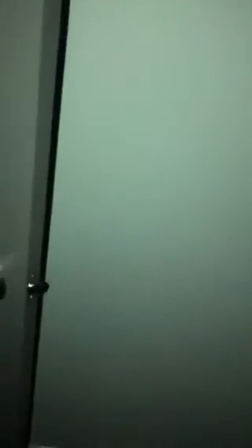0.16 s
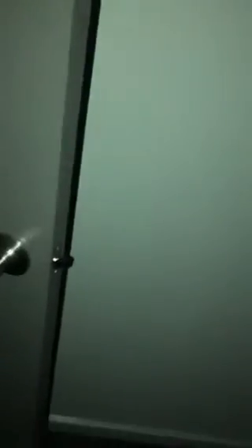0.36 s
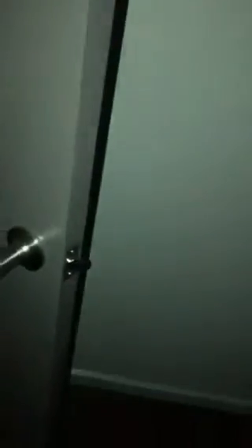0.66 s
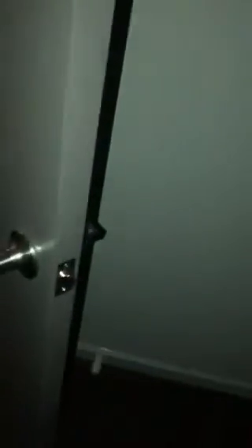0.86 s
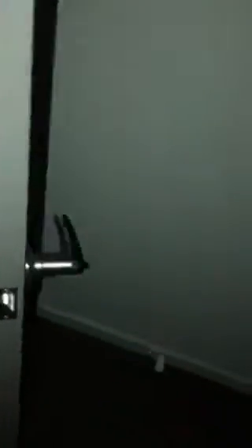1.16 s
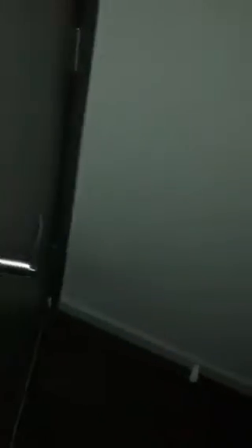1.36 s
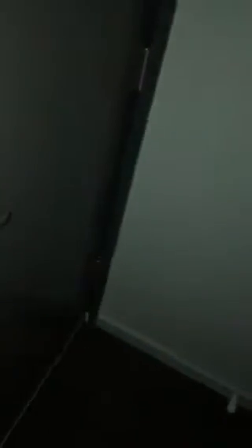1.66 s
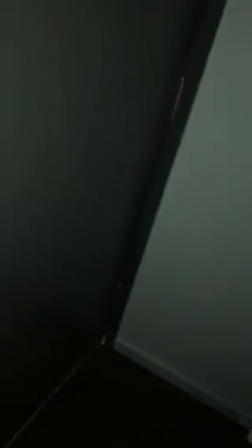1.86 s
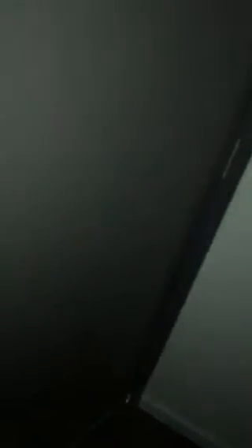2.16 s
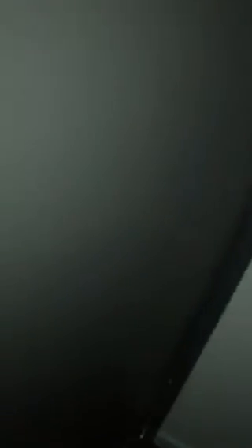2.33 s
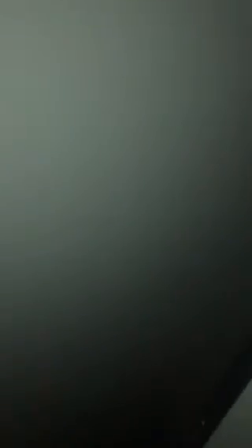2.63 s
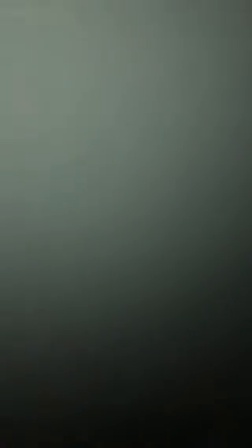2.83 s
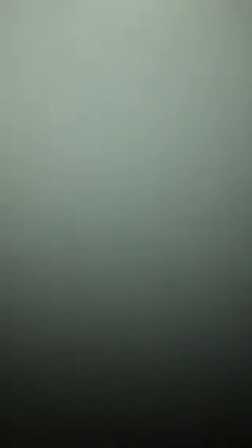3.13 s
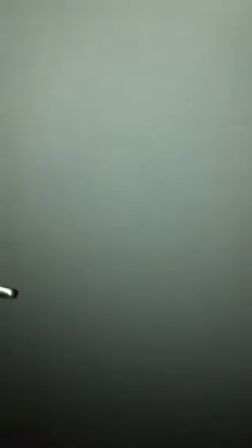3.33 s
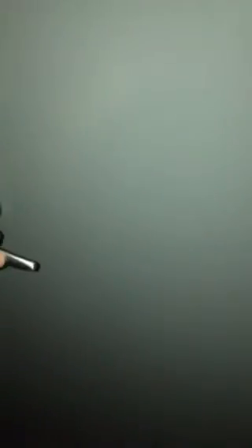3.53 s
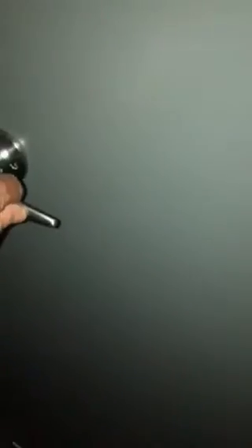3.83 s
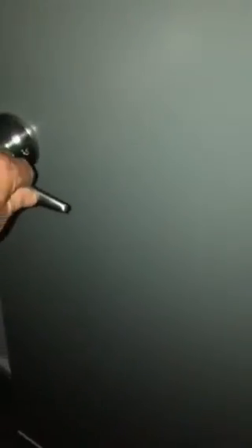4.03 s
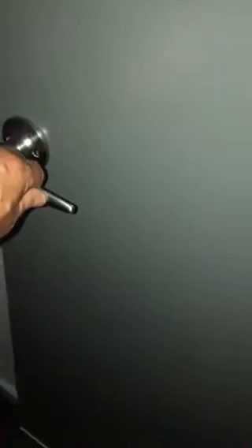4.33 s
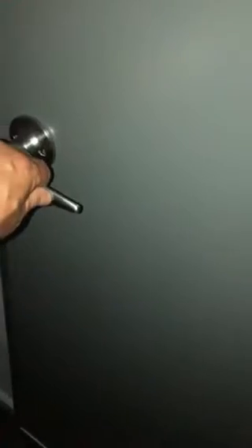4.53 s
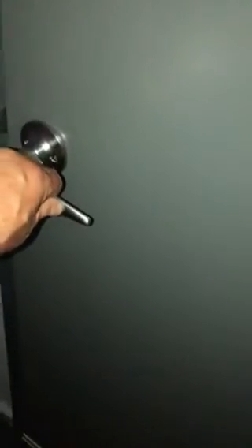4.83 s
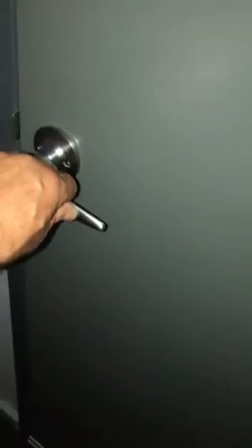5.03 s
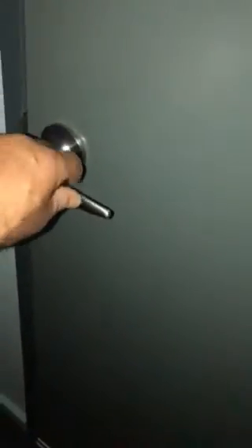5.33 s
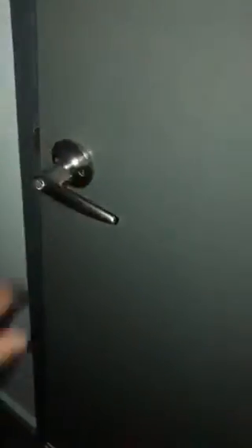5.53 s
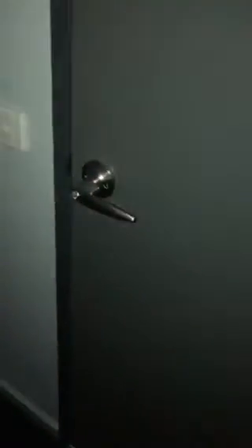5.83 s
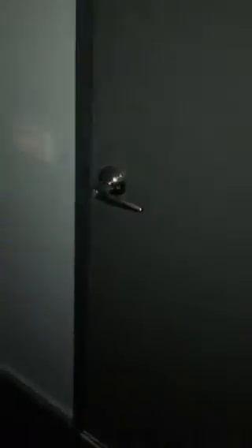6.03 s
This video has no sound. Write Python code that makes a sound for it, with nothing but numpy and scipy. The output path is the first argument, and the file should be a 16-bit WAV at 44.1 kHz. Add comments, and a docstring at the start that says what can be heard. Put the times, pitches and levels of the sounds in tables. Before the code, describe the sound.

Soft shoe knocks and cloth rustles in an echoing bare shed, then a door latch clacks sharply, the lever clunks and the bolt snaps home.

```python
"""A light door in a bare, echoing shed, an arm's length from the microphone, over still air and a faint hum.
First shoes knock and scuff and a sleeve rustles: dull noise knocks that ring boards, and rubbed noise. The hinge then
whistles thinly while the hum sinks away and returns, and from 2.1 s the door leaf bumps now and then: soft pushes on
low resonances. Later the latch bolt clacks on the strike plate, the loaded lever creaks and clunks and the bolt snaps
home: chattering contacts that ring steel, and a lingering handle. The leaf thuds in its frame after the latch; shoes
and sleeve stir again at the end. Noise tails give the echo of the shed."""
import sys
import numpy as np
from scipy import signal
from scipy.fft import rfft, irfft
from scipy.io import wavfile
from scipy.ndimage import uniform_filter1d

SR = 44100
rng = np.random.default_rng(int(sys.argv[2]) if len(sys.argv) > 2 else 0)


def put_to_file(sound):
    """Save the sound as 16-bit audio at rate SR, in the file named by the first command-line argument."""
    columns = np.atleast_2d(sound).T  # one column per channel
    safe = np.clip(columns, -1, 1)
    whole_steps = np.round(safe * 32767)
    wavfile.write(sys.argv[1], SR, whole_steps.astype(np.int16))


N = 272559
SIZE, ECHO_SIZE = 8192, 65536  # samples in a short response and in an echo
TIME = np.arange(N) / SR
AGE = TIME[:SIZE]

# Levels are relative within each layer; the mix sets the final balance.
# The shed's echo. Each row: frequency in Hz, time to die away by 60 dB in s, echo level in dB.
SHED_ECHO = [(49.6, 0.64, -1.5), (155, 0.59, 4), (400, 0.98, 3), (955, 1.31, 1), (1850, 1.67, 3),
             (3020, 1.23, -2), (7600, 0.96, -4.5), (15000, 0.55, -6)]
# Standing waves between the walls. Each entry: frequency in Hz.
STANDING_WAVES_HZ = [209, 337, 436, 579, 661, 770, 820, 1033, 1183, 1250, 1370, 1483, 1547, 1760]

# Still air around the microphone. Each row: frequency in Hz, gain in dB.
AIR_COLOUR = [(15, -56.5), (25, -22.5), (64, -3.5), (87, -4), (117, -8.5), (141, -6.5), (195, -6.5),
              (229, -12.5), (405, -13), (1890, -40.5), (2410, -31.5), (3080, -46), (16000, -42)]
AIR_DB = -63.5  # rms
# Lines of the machine hum. Each row: frequency in Hz, relative level in dB.
HUM_LINES = [(75.4, -64.5), (150.7, -72.5), (231.5, -72)]
# Rise and fall of the hum. Each row: time in seconds, gain in dB.
HUM_LEVEL = [(0, 3.5), (1.8, -34), (3.2, 4), (6, 4.5)]

# Soles sliding on the floor. Each row: start in seconds, length in seconds, level in dB.
SHOE_SLIDES = [(.46, 0.12, -63.5), (.66, 0.39, -56), (1.7, 0.23, -67), (2.15, 0.65, -62.5),
               (2.97, 0.043, -59), (5.55, 0.11, -58), (6.13, 0.045, -65)]
# Colour of the sliding soles. Each row: frequency in Hz, gain in dB.
SCUFF_COLOUR = [(30, -2), (120, 2), (300, -5.5), (750, 0.5), (1700, -9.5), (3000, -15.5), (6000, -26),
                (15000, -36)]
# Sleeve rustling at each move of the arm. Each row: start in seconds, length in seconds, level in dB.
SLEEVE_MOVES = [(.07, 0.045, -66), (.76, 0.078, -65.5), (1.36, 0.042, -65.5), (1.56, .05, -71.5),
                (2.26, 0.074, -63.5), (2.65, 0.23, -75), (3.75, 0.076, -61.5), (5.68, 0.17, -64),
                (6.12, 0.075, -70)]
# Colour of the rustling cloth. Each row: frequency in Hz, gain in dB.
CLOTH_COLOUR = [(300, -6), (1500, -3), (3000, -0.5), (6000, -6.5), (10000, -15), (15000, -19)]
SLEEVE_REST_DB = -74  # the cloth is never quite still; level within the rubbing layer
# Cloth brushing quickly over cloth. Each row: start in seconds, length in seconds, level in dB.
SLEEVE_SWISHES = [(1.11, 0.055, -85), (1.3, 0.099, -59), (1.56, 0.06, -70.5), (5.675, 0.045, -67.5)]
# Colour of the quick brushing. Each row: frequency in Hz, gain in dB.
SWISH_COLOUR = [(2000, -17), (6000, -2), (9500, 4), (15000, 3.5)]
# The turning hinge rubbing. Each row: start in seconds, length in seconds, level in dB.
HINGE_TURNS = [(1.74, 0.16, -66.5)]
# Colour of the hinge's thin whistle. Each row: frequency in Hz, gain in dB.
HINGE_COLOUR = [(1500, -10), (2600, -5), (3500, -17), (4650, -10.5), (4950, -7), (5250, -21), (9000, -48)]

# Weight landing on the floor. Each row: start in seconds, level in dB, softness corner in Hz.
FOOTFALLS = [(.034, -56, 400), (0.379, -44.5, 174), (.747, -55, 89), (1.09, -34.5, 294), (1.11, -47.5, 90),
             (2.257, -46, 320), (2.976, -49.5, 600), (5.667, -46.5, 400)]
# Resonances of the floor. Each row: frequency in Hz, width in Hz, level in dB.
FLOOR_MODES = [(47, 11, 11.5), (59.4, 29, 6), (105, 15, -2.5), (141, 38, -9), (193.4, 20, 1), (215, 30, 1),
               (377, 330, -4)]
# Shoe scuffs and soft knocks on wood.
# Each row: start in seconds, level in dB, hardness as upper edge in Hz, die-away time in seconds.
KNOCKS = [(.032, -51, 3200, .018), (.372, -47.5, 2250, 0.038), (.74, -52.5, 2010, 0.0048),
          (1.077, -42.5, 2300, 0.036), (2.084, -50, 1500, .014), (2.255, -47, 2920, 0.021),
          (2.448, -48, 2390, 0.033), (2.485, -49, 1860, .02), (2.52, -50, 2440, 0.011),
          (2.626, -48.5, 1600, 0.026), (2.8991, -41.5, 1720, 0.0052), (3.12, -44.5, 1740, 0.00092),
          (3.146, -48.5, 1850, 0.014), (3.253, -49, 1150, 0.0084), (4.096, -64.5, 2600, 0.0067),
          (5.325, -43, 1500, 0.0066), (5.367, -42.5, 943, 0.017), (5.403, -48, 1110, 0.004),
          (5.513, -52.5, 1826, 0.0095), (6.168, -49, 1150, 0.0079)]
# Spectrum of a knock, higher for a harder one. Each row: multiple of its upper edge, gain in dB.
KNOCK_SHAPE = [(0.044, -10.5), (.18, -3.5), (.34, 0.5), (.9, -6), (1.35, -15.5), (2.2, -32.5), (5, -46)]
# Wooden boards that every knock rings. Each row: frequency in Hz, width in Hz, level in dB.
BOARD_MODES = [(360, 31, -0.5), (567, 17, 3.5), (632, 28, 1), (756, 44, -1), (848, 18, 2), (998, 29, -4),
               (1125, 32, -4), (1375, 49, 1), (1600, 46, 1.5), (1865, 23, -19), (3650, 200, 4.5)]
# Colour of grit crushed on the floor. Each row: frequency in Hz, gain in dB.
GRIT_COLOUR = [(300, -4), (1500, -3), (2700, -1.5), (3800, 0.5), (5300, 0), (6800, -6), (9000, -12.5),
               (11300, -15.5), (15000, -22.5)]
# Grit relative to a knock with this upper edge; harder knocks crush more.
GRIT_DB, GRIT_EDGE_HZ, GRIT_DB_PER_OCTAVE = -20.5, 2400, 16
# Sharp little ticks. Each row: start in seconds, level in dB, upper edge in Hz, die-away time in seconds.
TICKS = [(.033, -57.5, 4000, .018), (.385, -58.5, 2800, 0.047), (1.083, -54, 2460, 0.085),
         (2.006, -53, 7560, .008), (2.012, -54, 3530, 0.044), (2.084, -57.5, 4000, 0.016),
         (2.256, -65, 2000, 0.033), (2.447, -62, 14000, 0.0042), (2.463, -67, 14000, .005),
         (2.485, -56, 7500, 0.016), (2.6257, -56, 16000, 0.0067), (2.8987, -49.5, 15000, 0.0048),
         (3.184, -67.5, 4050, 0.0043), (4.096, -63.5, 4020, 0.0049), (5.326, -55, 7000, 0.011),
         (5.367, -55, 12000, 0.012)]
# Tiny resonances that the ticks ring. Each row: frequency in Hz, width in Hz, level in dB.
TINKLE_MODES = [(4300, 540, 3.5), (5440, 600, -5), (6380, 310, -1), (11100, 200, -3), (11500, 600, 3.5),
                (13300, 1200, 0)]

# The door leaf bumped and seating in its frame. Each row: start in seconds, level in dB, softness corner in Hz.
BUMPS = [(2.101, -47.5, 240), (2.491, -47.5, 500), (2.645, -51, 335), (3.122, -47.5, 520),
         (4.536, -39.5, 228), (5.027, -62, 130), (5.333, -32, 124)]
# Resonances of the door leaf. Each row: frequency in Hz, width in Hz, level in dB.
LEAF_MODES = [(80, 12, -7), (101, 50, -8), (162, 30, 2.5), (185, 52, -6.5), (221, 28, 2), (318, 110, 3.5),
              (430, 60, -1)]
# The lever meeting its stop, then slipping from the fingers.
# Each row: start in seconds, clunk level in dB, metallic tick level in dB.
CLUNKS = [(5.0217, -47, -44), (5.0241, -32.5, -45), (5.353, -45, -62), (5.385, -49, -67)]
# Resonances of the lever. Each row: frequency in Hz, width in Hz, level in dB.
LEVER_MODES = [(800, 33, 0.12), (920, 120, -1.5), (1114, 100, -1.09)]
# Resonances of its spring. Each row: frequency in Hz, width in Hz, level in dB.
SPRING_MODES = [(3100, 220, -9.5), (6500, 90, 7), (9830, 125, 1), (13800, 330, -12)]
# Lingering ring of the handle. Each row: frequency in Hz, level in dB, time to die away by 60 dB in s.
HANDLE_TONES = [(1183, 8, 0.99), (1910, -7, 1), (2889, -1.5, 0.74), (3500, 6, .5), (3970, 9.5, 0.5),
                (4140, 0, 0.34), (5276, -7.5, .4), (6060, -5, 0.86), (7900, 2.5, .47), (14770, -16.5, .25)]
# Latch bolt against the strike plate, then small dull creaking ticks of the loaded lever.
# Each row: start in seconds, level in dB, chatter time in seconds, softness corner in Hz.
STRIKES_AND_CREAKS = [(4.5331, -43, .0015, 6000), (4.535, -23.5, .001, 15000),
                      (4.5388, -31.5, 0.00041, 1500), (4.5505, -41.5, .0008, 13000),
                      (4.757, -40.5, 0.00036, 3500), (4.776, -43.5, 0.000082, 3900),
                      (5.0014, -45, .0002, 4500), (5.015, -46.5, 0.00054, 4000)]
# Resonances of the strike plate. Each row: frequency in Hz, width in Hz, level in dB.
PLATE_MODES = [(1150, 58, -20), (1480, 72, -6), (1580, 140, 3), (1740, 150, -8), (2730, 180, 0),
               (2950, 110, -8.5), (4500, 320, 1), (5700, 350, -7), (7160, 170, -14), (8750, 350, -15.5),
               (10500, 370, -7.5), (14200, 150, -22.5)]
# Colour of the crack at the plate. Each row: frequency in Hz, gain in dB.
PLATE_CRACK = [(100, -6.5), (400, -15), (680, -16.5), (1050, 0), (1650, 1), (2200, -7.5), (3000, 4.5),
               (4000, -8.5), (5500, -2), (8500, -6.5), (10500, -12.5), (11100, -18.5), (16000, -23.5)]
# Bolt sliding and snapping home.
# Each row: start in seconds, level in dB, chatter time in seconds, softness corner in Hz.
SNAPS = [(5.0435, -39.5, 0.00053, 4500), (5.0566, -42, .004, 7000), (5.062, -26.5, 0.0017, 16000),
         (5.0637, -23, 0.0014, 7000), (5.0687, -37, 0.0022, 9000), (5.0788, -45, .0018, 15000)]
# Resonances of the bolt. Each row: frequency in Hz, width in Hz, level in dB.
BOLT_MODES = [(484, 96, 0), (1140, 150, -11), (1597, 67, 6), (2150, 200, -9), (2750, 75, 1),
              (3500, 150, 4.5), (4000, 200, 3.5), (4550, 200, -1.5), (5200, 220, -9), (6340, 200, 0),
              (7000, 260, -3.5), (7700, 130, -3.5), (9500, 150, -22), (12600, 200, -26), (14800, 200, -18)]
# Colour of the crack of the bolt. Each row: frequency in Hz, gain in dB.
BOLT_CRACK = [(100, -20.5), (450, -6.5), (1000, -1.5), (1600, -2.5), (2200, -2), (3150, -1.5), (3750, 0),
              (4850, -9), (5400, -2), (6500, -2.5), (9000, -9), (12000, -10), (15000, -6.5)]


def undb(db):
    """Decibels to gain."""
    return 10 ** (np.asarray(db) / 20)


def blow(x, db):
    """Scale a blow to the energy of a hundredth of a second at this rms level."""
    return x * undb(db) * np.sqrt(SR / 100 / np.sum(x ** 2))


def add(track, s, x):
    """Mix a sound in at a time in seconds."""
    start = int(np.clip(s * SR, 0, N - 1))
    track[start:start + len(x)] += x[:N - start]


def along(points, size):
    """Spread (Hz, value) points over the bins of a transform, on a log frequency axis."""
    hz, value = np.transpose(points)
    return np.interp(np.log(np.fft.rfftfreq(size, 1 / SR) + 1), np.log(hz), value)


def through(x, response):
    """Pass a sound through a response, keeping its length."""
    return signal.fftconvolve(x, response)[:len(x)]


def colour(x, points):
    """Filter with a (Hz, dB) shape, causal and minimum-phase by folding the cepstrum."""
    cepstrum = irfft(np.log(undb(along(points, SIZE))))
    cepstrum[1:SIZE // 2] *= 2
    cepstrum[SIZE // 2 + 1:] = 0
    return through(x, irfft(np.exp(rfft(cepstrum))))


def ring(modes):
    """Response of a body: one decaying sine per resonance, dying faster the wider it is."""
    response = np.zeros(SIZE)
    for hz, width_hz, db in modes:
        decay = width_hz * np.exp(-np.pi * width_hz * AGE)
        response += undb(db) * decay * np.sin(2 * np.pi * hz * AGE)
    return response


def contact(length, first_db):
    """Force of a blow: a first impact and a dying chatter of tiny contacts, even over all pitches."""
    chatter = blow(rng.standard_normal(SIZE) * np.exp(-AGE / length), 0)
    impact = blow(signal.unit_impulse(SIZE), first_db)
    even = irfft(np.exp(1j * np.angle(rfft(chatter + impact))))  # keep phase, flatten the spectrum
    return even * np.exp(-(AGE / (4 * length)) ** 2)


def walk(rate):
    """Random levels drawn at a rate in Hz with straight slopes between; spread a little under 1."""
    hold = int(SR / rate)
    return uniform_filter1d(np.repeat(rng.standard_normal(N // hold + 1), hold), hold)[:N]


def hiss(points):
    """Coloured noise of rms 1."""
    noise = colour(rng.standard_normal(N), points)
    return noise / np.std(noise)


def shed(build_s, standing_width_hz, standing_lift, early_lift, early_s):
    """Echo of the bare walls, longest in the middle range; every blow takes its own paths around them."""
    age = TIME[:ECHO_SIZE]
    bins_hz = np.fft.rfftfreq(2 * ECHO_SIZE, 1 / SR)
    standing = sum(1 / (1 + ((bins_hz - hz) / standing_width_hz) ** 2) for hz in STANDING_WAVES_HZ)
    ripple = 1 + standing_lift * standing
    ripple /= uniform_filter1d(ripple, size=1200)  # the peaks gather energy from their neighbours
    spectrum = rfft(rng.standard_normal(2 * ECHO_SIZE)) * ripple
    bands = []
    for k, (_, t60, db) in enumerate(SHED_ECHO):
        share = along([(row[0], j == k) for j, row in enumerate(SHED_ECHO)], 2 * ECHO_SIZE)
        decay = np.log(1000) / t60
        build = 1 - np.exp(-(age / build_s) ** 2)
        fade = np.exp(-decay * age) * build * np.sqrt(2 * decay / SR)
        fade *= 1 + early_lift * np.exp(-age / early_s)  # the nearest walls answer first and strongest
        bands.append((irfft(spectrum * share), fade * undb(db)))

    def echo(x):
        """The tail that a sound leaves in the shed, cut from a random place in the scattered noise."""
        start = rng.integers(ECHO_SIZE)
        tail = sum(scatter[start:start + ECHO_SIZE] * fade for scatter, fade in bands)
        return signal.fftconvolve(x, tail)
    return echo


def background():
    """Still air as coloured noise, and a machine hum of sines that waver in level and phase."""
    hum = np.zeros(N)
    for hz, db in HUM_LINES:
        level = undb(db - 5 + 1.71 * walk(18)) * np.sqrt(2)
        hum += level * np.sin(2 * np.pi * hz * TIME + 0.3 * walk(3))
    hum *= undb(np.interp(TIME, *np.transpose(HUM_LEVEL)))
    return hum + hiss(AIR_COLOUR) * undb(AIR_DB)


def rub(strokes, points, attack_s, release_s, rough_db):
    """Sliding friction: each stroke swells, holds and dies away, catching and slipping as it goes."""
    effort = np.zeros(N)
    for s, length, db in strokes:
        early = np.maximum(s - TIME, 0)
        late = np.maximum(TIME - s - length, 0)
        effort += undb(db) * np.exp(-(early / attack_s) ** 2 - late / release_s)
    roughness = undb(rough_db * (walk(24.54) + walk(300)))
    return hiss(points) * effort * roughness


def friction():
    """Soles, sleeve and hinge rub as the door is worked, each a noise of its own colour."""
    soles = rub(SHOE_SLIDES, SCUFF_COLOUR, attack_s=0.046, release_s=0.099, rough_db=0.5)
    sleeve = rub(SLEEVE_MOVES, CLOTH_COLOUR, attack_s=0.038, release_s=0.084, rough_db=0.15)
    sleeve += undb(SLEEVE_REST_DB) * hiss(CLOTH_COLOUR)
    swish = rub(SLEEVE_SWISHES, SWISH_COLOUR, attack_s=0.016, release_s=0.018, rough_db=2.5)
    hinge = rub(HINGE_TURNS, HINGE_COLOUR, attack_s=0.06, release_s=0.04, rough_db=1.6)
    return soles + sleeve + swish + hinge


def ticks(echo, direct_db, wet_db, tinkle_db):
    """Small hard contacts: a short crunch and a faint tinkle, bright up to the tick's edge."""
    out, body = np.zeros(N), ring(TINKLE_MODES)
    bright = [(hz, db + 6.5 * (hz > 8000)) for hz, db in GRIT_COLOUR]  # grit with its top lifted
    for s, db, edge_hz, length in TICKS:
        softness = [(edge_hz, 0), (edge_hz * 2, -13)]
        crunch = blow(colour(contact(length, first_db=-14), bright), 0)
        tinkle = blow(through(contact(length, first_db=-21), body), tinkle_db)
        tick = blow(colour(crunch + tinkle, softness), db)
        add(out, s, undb(direct_db) * tick)
        add(out, s, undb(wet_db) * echo(tick))
    return out


def knocks(echo, wet_db):
    """Each scuff or bump is a broad, dull knock that rings the boards; the harder, the brighter and grittier."""
    out, boards = np.zeros(N), ring(BOARD_MODES)
    for s, db, edge_hz, length in KNOCKS:
        shape = [(multiple * edge_hz, shape_db) for multiple, shape_db in KNOCK_SHAPE]
        knock = blow(colour(contact(length, first_db=-15), shape), db - 2.0)
        wood_force = colour(contact(length, first_db=-25.0), shape)
        wood = blow(through(wood_force, boards), db - 6.5)
        grit_db = db + GRIT_DB + GRIT_DB_PER_OCTAVE * np.log2(edge_hz / GRIT_EDGE_HZ)
        grit = blow(colour(contact(length, first_db=-23), GRIT_COLOUR), grit_db)
        add(out, s, undb(4.0) * (knock + wood + grit))
        add(out, s, undb(wet_db) * echo(knock + undb(-6.5) * wood + grit))
    return out


def thuds(echo, pushes, length, modes, wet_db):
    """Soft, heavy pushes ring a panel's low resonances; a softer push holds less treble."""
    out, panel = np.zeros(N), ring(modes)
    for s, db, corner_hz in pushes:
        softness = [(corner_hz / 6, -10), (corner_hz / 2.55, 0), (corner_hz, -2), (corner_hz * 8, -28)]
        push = colour(contact(length, first_db=-7.5), softness)
        thud = blow(through(push, panel), db)
        add(out, s, thud)
        add(out, s, undb(wet_db) * echo(thud))
    return out


def handle(echo):
    """The lever clunks on its stop and its spring ticks; the hardest bolt snap leaves the handle ringing."""
    out = np.zeros(N)
    cushion = [(300, -4.0), (650, 2.5), (1200, 4.0), (2400, -18.5)]  # the hand softens the clunk
    for s, clunk_db, tick_db in CLUNKS:
        clunk = blow(colour(ring(LEVER_MODES), cushion), clunk_db)
        tick = blow(through(contact(0.005, first_db=-11.5), ring(SPRING_MODES)), tick_db)
        tick += blow(contact(0.001, first_db=2.5), tick_db + 1)
        add(out, s, clunk + tick)
        add(out, s, echo(undb(1.5) * clunk + undb(-0.5) * tick))
    tone = np.zeros(N)
    for hz, db, t60 in HANDLE_TONES:
        tone += undb(db) * np.exp(-np.log(1000) * TIME / t60) * np.sin(2 * np.pi * hz * TIME)
    hardest_snap = max(SNAPS, key=lambda hit: hit[1])
    add(out, hardest_snap[0], blow(tone, -36.5))
    return out


def latch(echo, hits, modes, crack, ring_db, crack_db, wet_db):
    """Steel on steel: a chattering contact cracks and rings the part's short resonances."""
    out, body = np.zeros(N), ring(modes)
    for s, db, length, corner_hz in hits:
        softness = [(corner_hz, 0), (corner_hz * 2, -12), (corner_hz * 4, -28)]
        ring_force = colour(contact(length, first_db=-21.5), softness)
        clink = blow(through(ring_force, body), db + ring_db)
        crack_force = colour(contact(length, first_db=-10), softness)
        clack = blow(colour(crack_force, crack), db + crack_db)
        add(out, s, clink + clack)
        # the clink goes a little more weakly into the echo than the clack
        add(out, s, undb(wet_db) * (echo(clack) + undb(-2) * echo(clink)))
    return out


def scene():
    """Every sound of the door and its user mixes direct sound with the shed's echo, in a balance set per layer."""
    echo = shed(build_s=0.0027, standing_width_hz=6.9, standing_lift=0.38, early_lift=0.17, early_s=0.06)
    rubbing = friction()
    movement = undb(-3.0) * rubbing + undb(-3.5) * echo(rubbing)[:N]
    movement += knocks(echo, wet_db=4.0)
    movement += ticks(echo, direct_db=3.0, wet_db=5.0, tinkle_db=-7.5)
    footfalls = thuds(echo, FOOTFALLS, 0.013, FLOOR_MODES, wet_db=1.0)
    leaf = thuds(echo, BUMPS, 0.0098, LEAF_MODES, wet_db=0.0)
    strike_and_creak = latch(echo, STRIKES_AND_CREAKS, PLATE_MODES, PLATE_CRACK,
                             ring_db=-6.0, crack_db=-2, wet_db=1.5)
    snap = latch(echo, SNAPS, BOLT_MODES, BOLT_CRACK, ring_db=-3.5, crack_db=-1, wet_db=0)
    return (background() + movement + footfalls + leaf + handle(echo) + strike_and_creak + snap)[None]


def record(dry):
    """The microphone sheds the deepest bass, below 39 Hz, and the top is cut above 16.1 kHz."""
    thin = signal.sosfilt(signal.butter(8, 39, "high", fs=SR, output="sos"), dry)
    return signal.sosfilt(signal.ellip(10, 0.2, 80, 16100, fs=SR, output="sos"), thin)


dry = scene()
out = record(dry)
put_to_file(out)
```